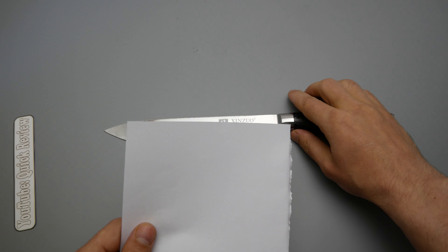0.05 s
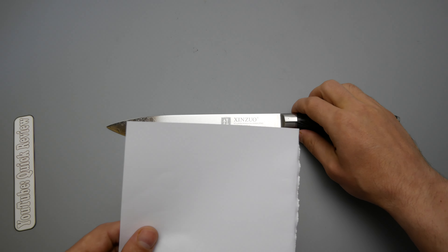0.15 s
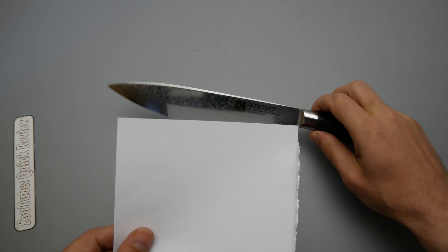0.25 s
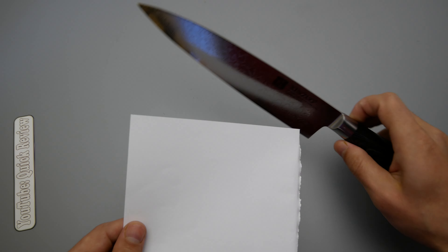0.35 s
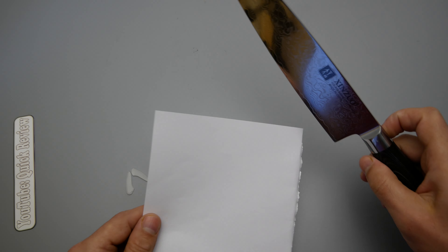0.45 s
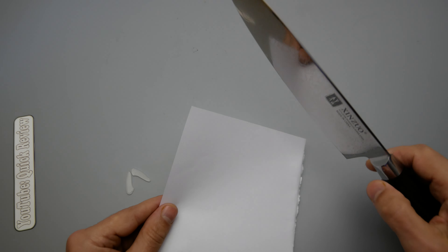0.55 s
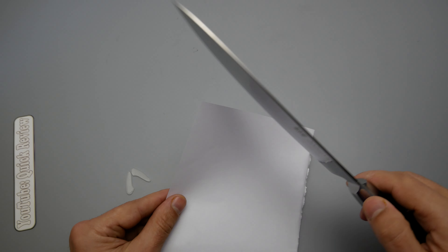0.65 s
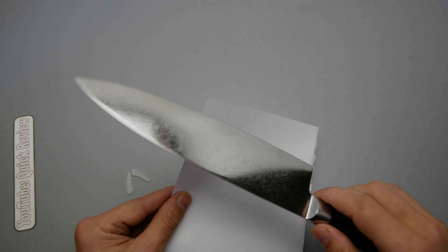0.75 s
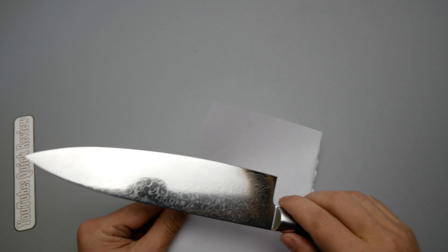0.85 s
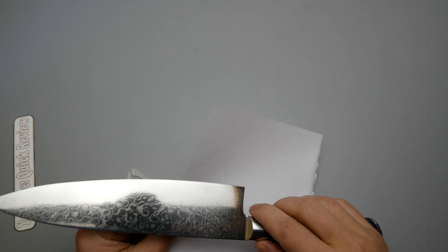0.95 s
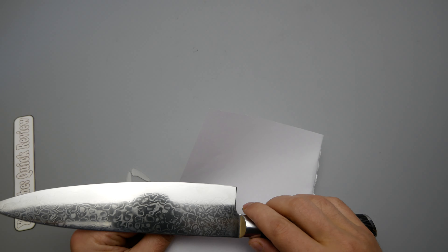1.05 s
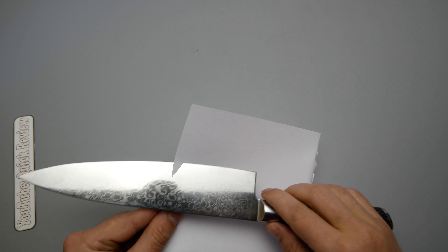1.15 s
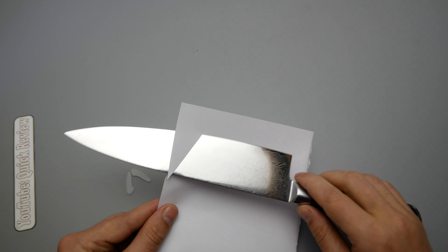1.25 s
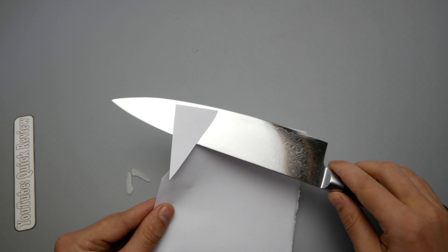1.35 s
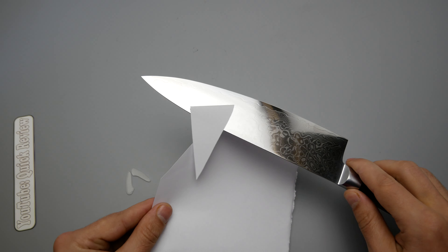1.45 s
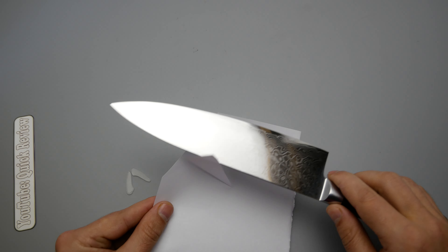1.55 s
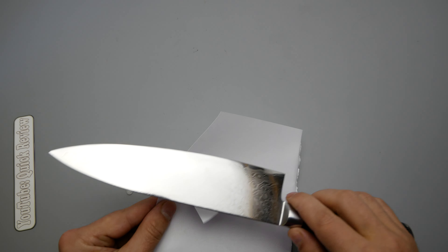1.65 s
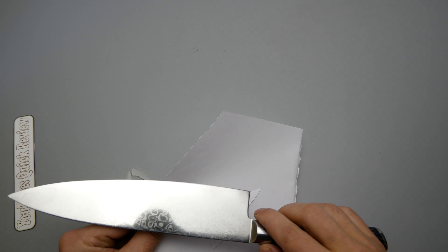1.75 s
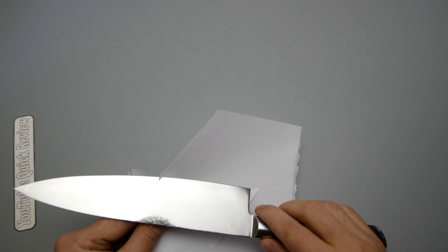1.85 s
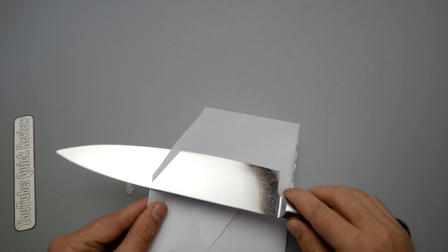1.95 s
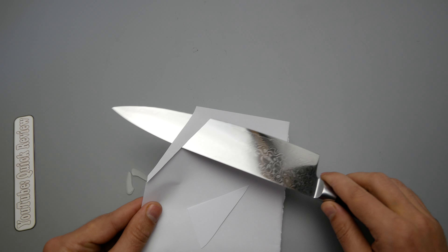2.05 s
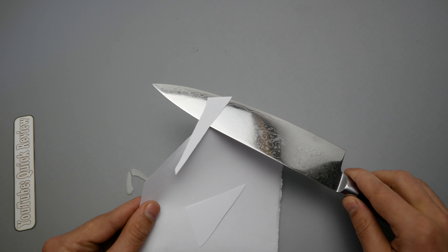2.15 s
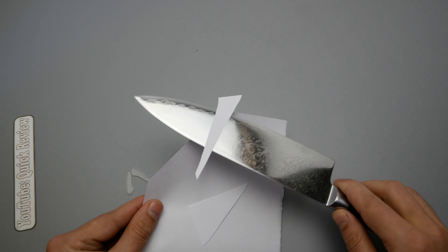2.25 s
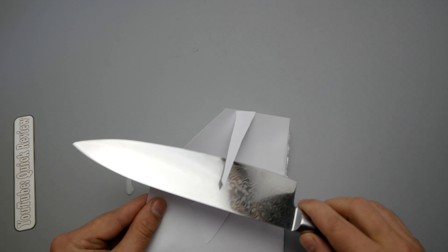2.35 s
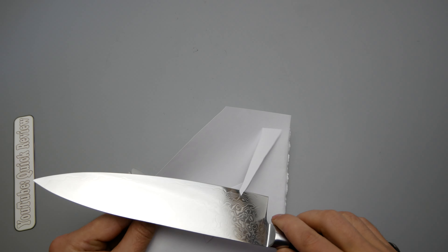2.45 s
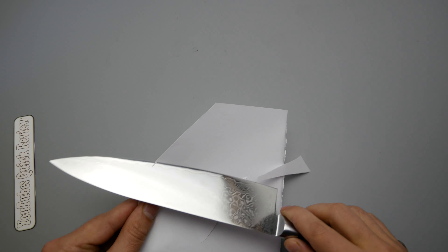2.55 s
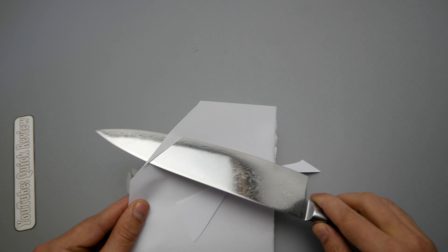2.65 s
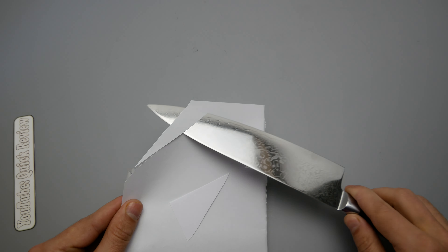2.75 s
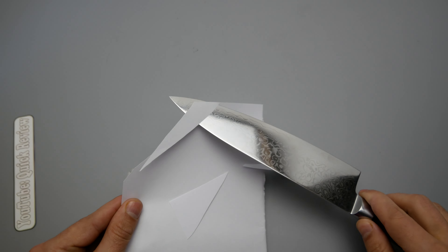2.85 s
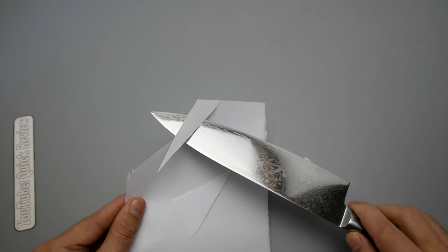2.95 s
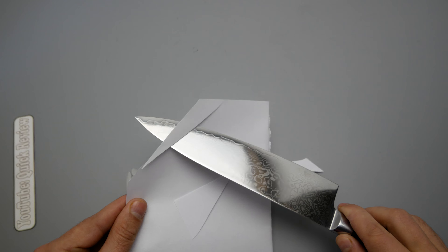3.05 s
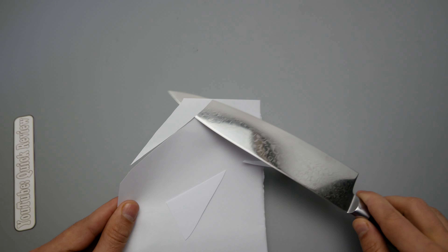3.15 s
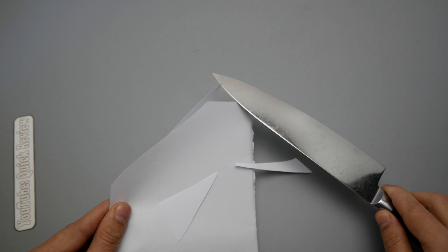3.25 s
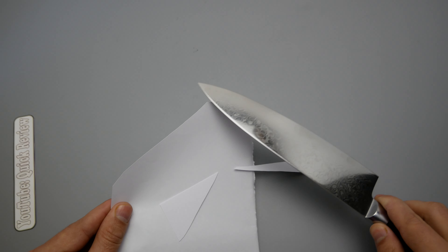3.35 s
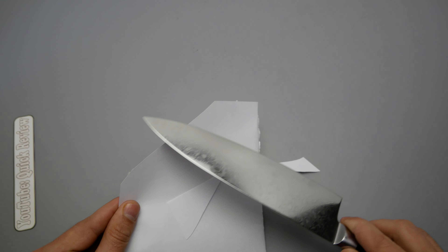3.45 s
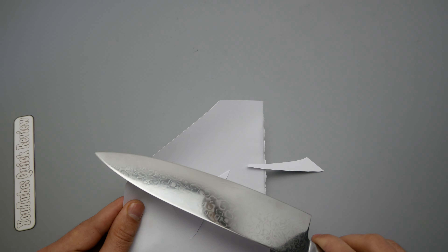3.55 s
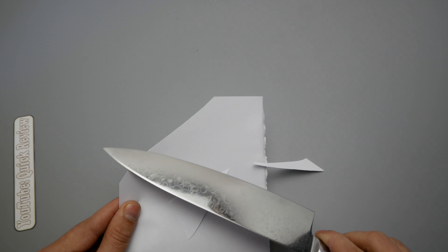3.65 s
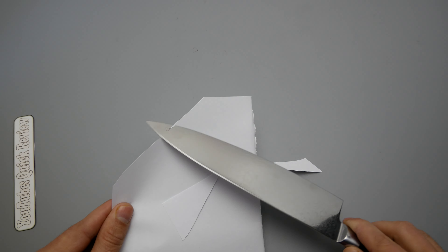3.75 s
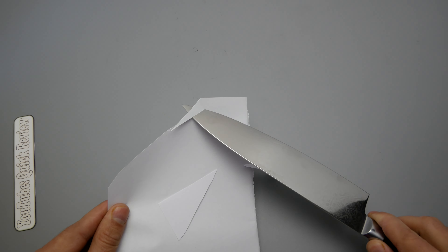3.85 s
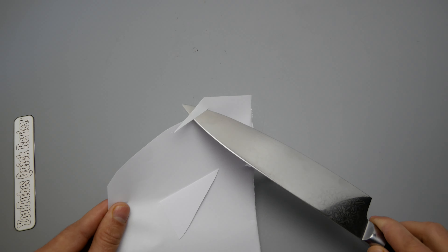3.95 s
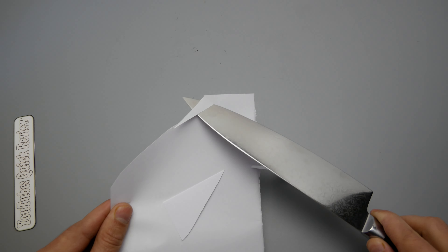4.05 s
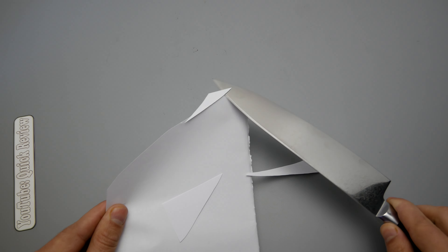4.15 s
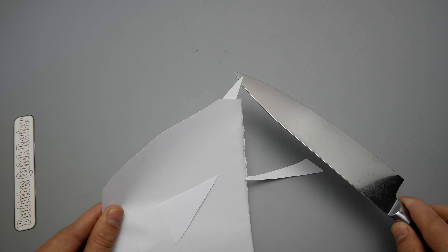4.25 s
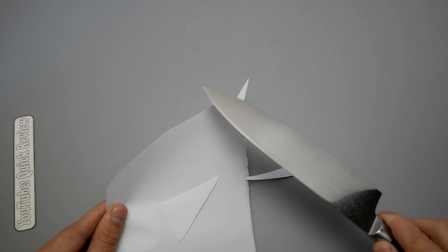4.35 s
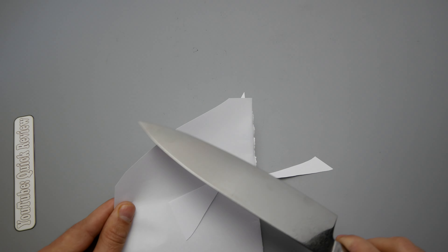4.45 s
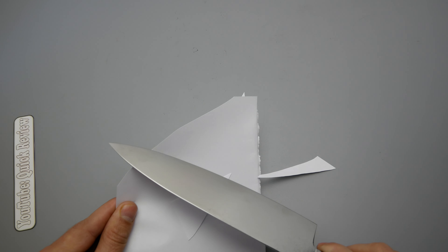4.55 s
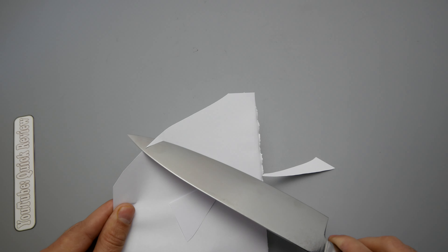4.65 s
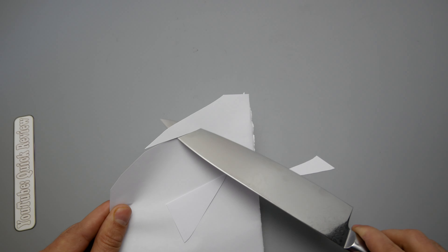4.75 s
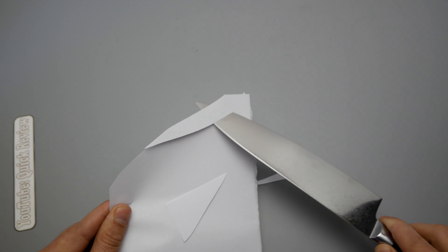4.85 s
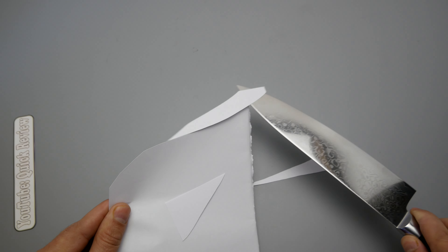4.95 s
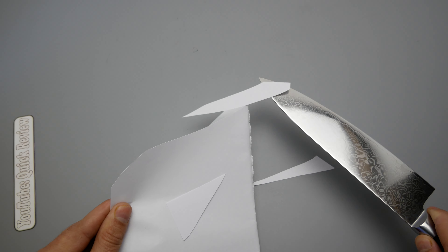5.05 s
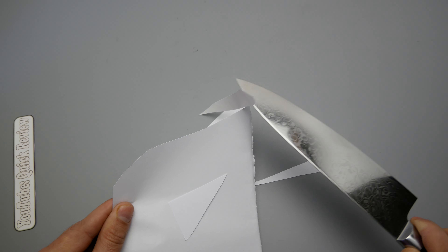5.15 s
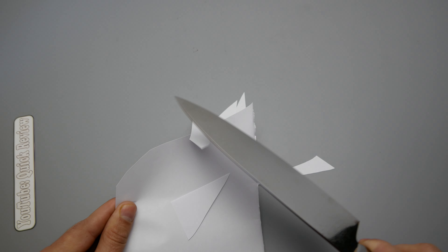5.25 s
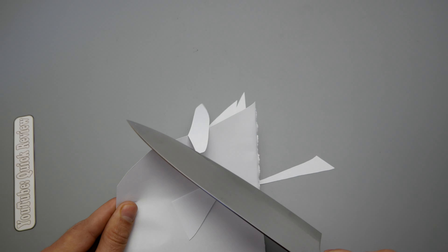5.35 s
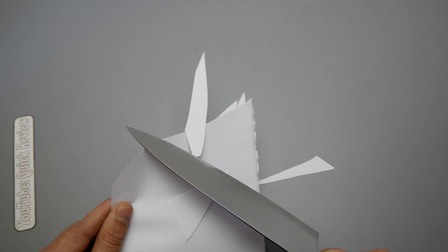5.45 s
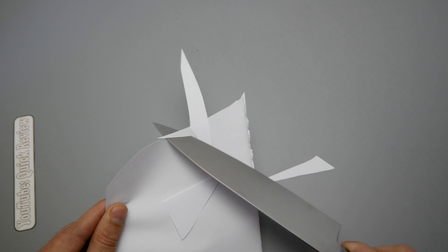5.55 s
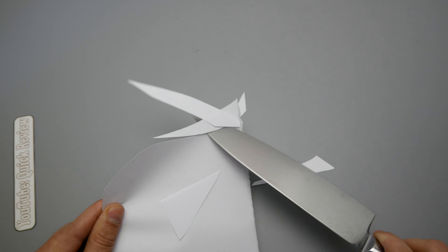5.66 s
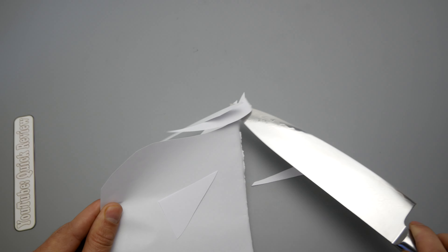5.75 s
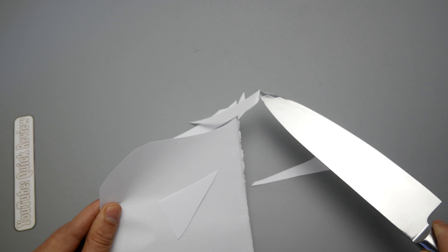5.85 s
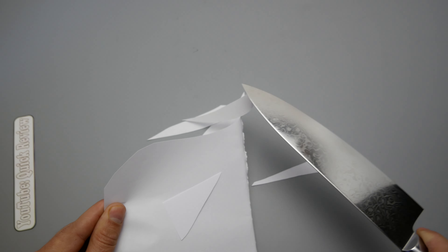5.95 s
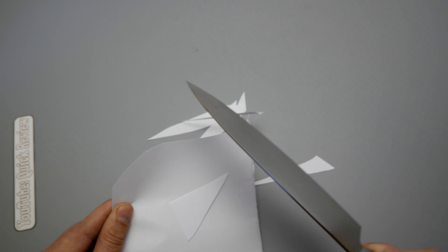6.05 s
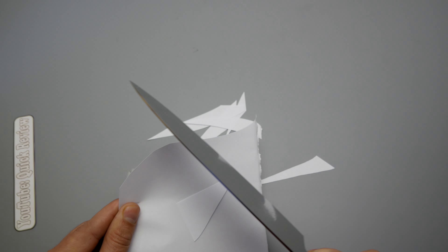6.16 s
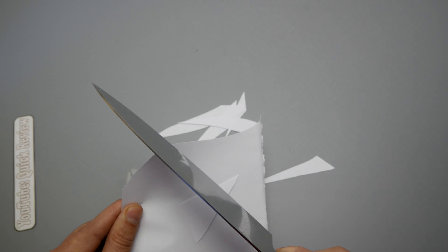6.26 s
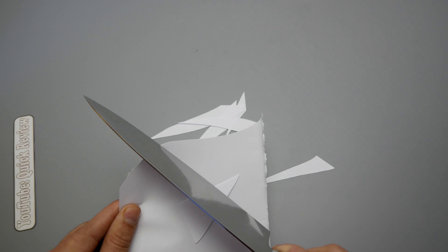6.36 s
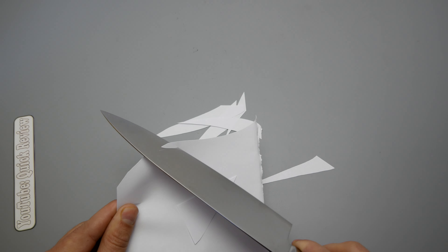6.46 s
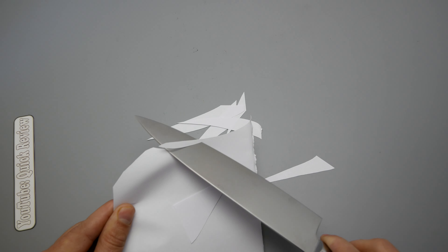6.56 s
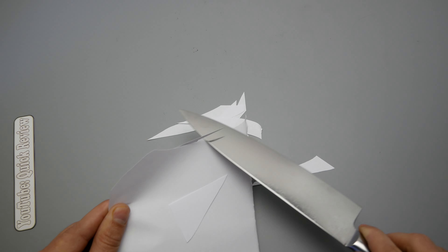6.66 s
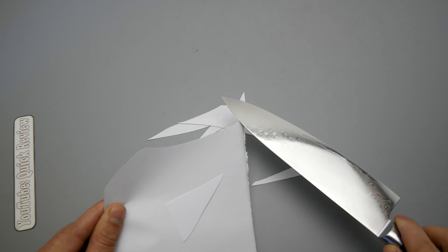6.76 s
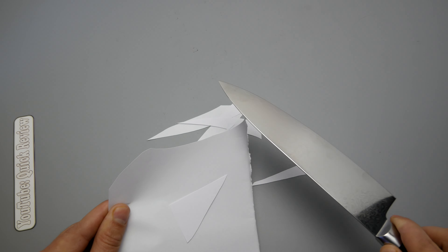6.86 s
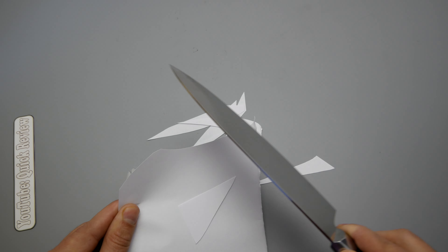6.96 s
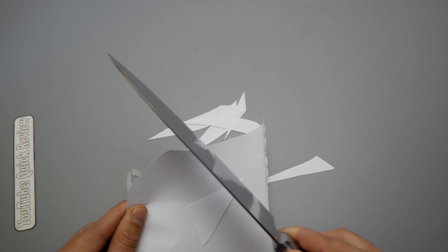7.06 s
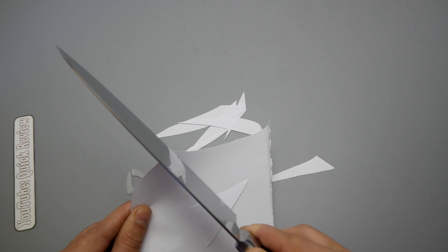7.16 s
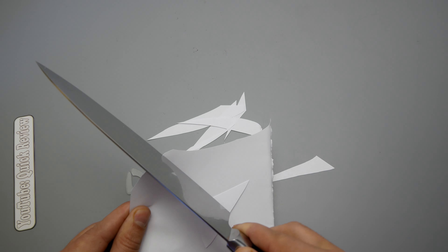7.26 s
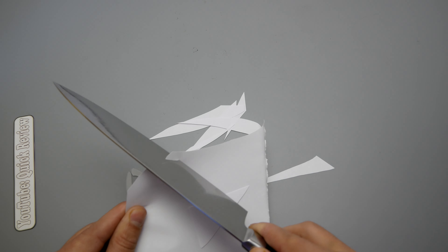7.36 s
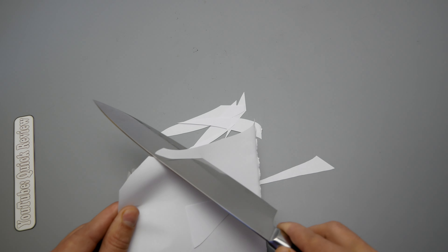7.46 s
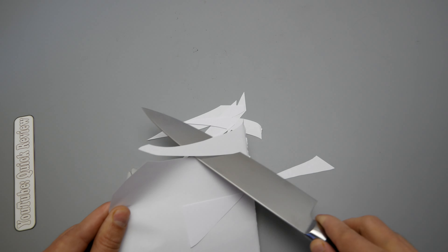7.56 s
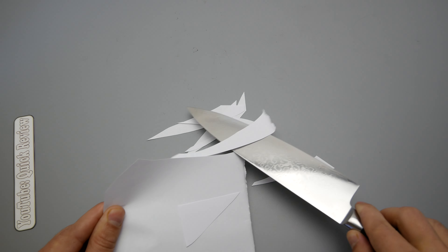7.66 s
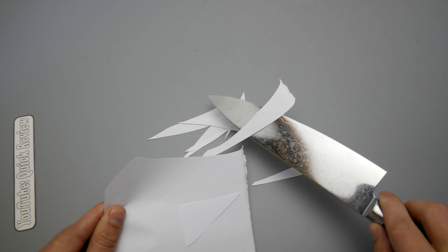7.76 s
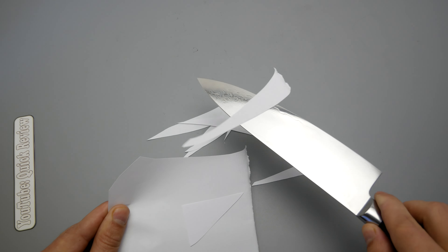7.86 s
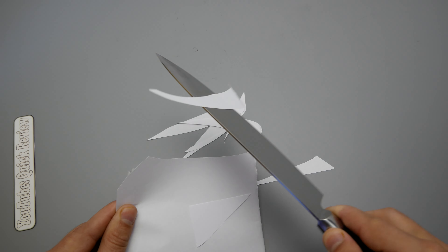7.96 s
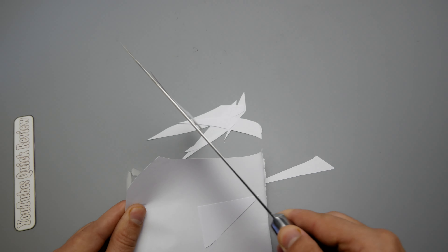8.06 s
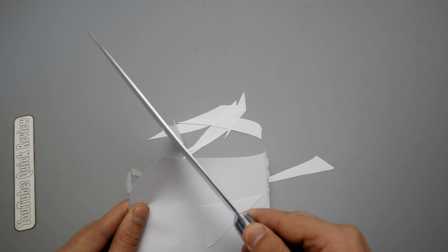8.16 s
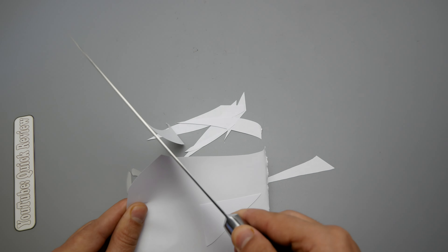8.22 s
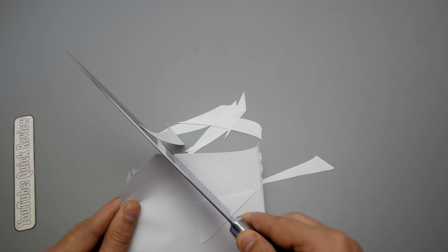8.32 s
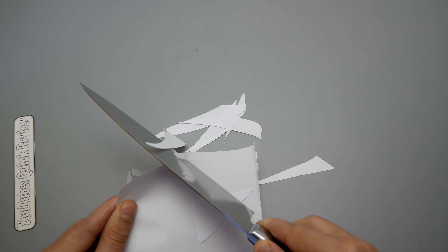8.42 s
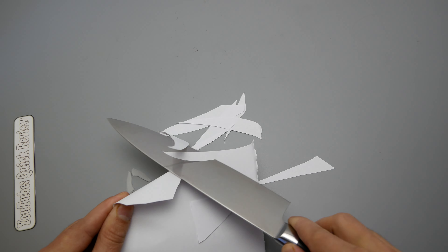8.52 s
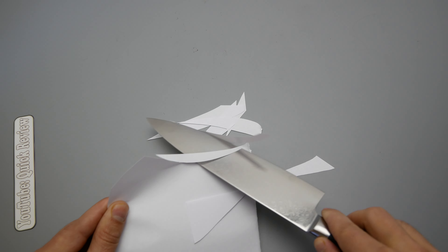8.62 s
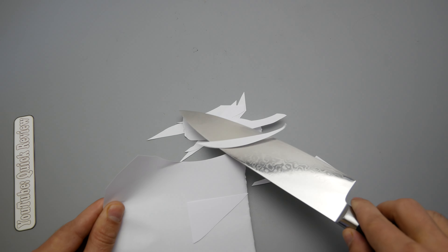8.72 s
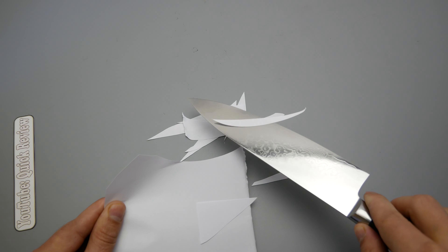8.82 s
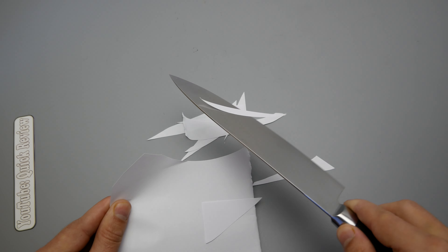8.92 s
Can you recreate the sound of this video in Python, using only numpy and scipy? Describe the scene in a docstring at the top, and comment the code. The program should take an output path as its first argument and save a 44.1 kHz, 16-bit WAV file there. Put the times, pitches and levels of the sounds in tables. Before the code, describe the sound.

A sheet of paper held near a stereo microphone rustles and snaps lightly, then a sharp knife shears strips from it in ten quick strokes. Each is a dense, bright, fibrous rip lasting a fraction of a second, followed by flutter and a very faint steel ring. Sharp paper snaps and taps fall between cuts. A small quiet room hums low and steadily behind.

```python
"""A small quiet room hums throughout, made from shaped noise and a few wavering tones.
At first a sheet of paper, held in the hand close to a stereo microphone, rustles and snaps lightly.
From about 1.2 s to the end a sharp knife slices off strips in ten cuts: dense grains of tearing fibres
shake the sheet. Between cuts it snaps (short knocks, cracks and thuds of noise) and rustles.
The blade rings faintly, as dying sine tones, after each cut."""
import sys
import numpy as np
from scipy import signal
from scipy.io import wavfile

SR = 44100
rng = np.random.default_rng(int(sys.argv[2]) if len(sys.argv) > 2 else 0)


def wrap_up_sound(samples):
    """Save the sound to the file named by the first command line argument, as 16-bit audio."""
    columns = np.atleast_2d(samples).T
    # keep every value between -1 and 1, then stretch to whole-number steps
    tamed = np.clip(columns, -1, 1)
    steps = np.round(tamed * 32767).astype(np.int16)
    wavfile.write(sys.argv[1], SR, steps)


N = 396459

# one curve for each cut, rows of (time [s], tearing level before the overall gain [dB],
# booming of the sheet against it [dB], pitch of the loose strip [Hz])
CUT_CURVES = [
    [(1.172, -65, 6, 4500), (1.18, -39, 8, 4490), (1.186, -27.5, -7.5, 4480), (1.268, -30, -10, 3930),
     (1.316, -29, -11.5, 3200), (1.362, -30, -9, 3450), (1.436, -33, -1.5, 3420)],
    [(1.915, -63, 15, 4180), (1.927, -40.5, -2, 4200), (1.939, -29.5, -5, 4300), (1.967, -31, -11, 4200),
     (1.993, -33, -3.5, 4000), (2.103, -30.5, -11.5, 3550), (2.119, -27.5, -8.5, 3670),
     (2.159, -31, -8, 3660), (2.184, -35.5, 3.5, 3640)],
    [(2.568, -60, 11, 3650), (2.622, -33, -1.5, 3400), (2.658, -31, 3.5, 3900), (2.684, -33, -1.5, 4150),
     (2.742, -28, -12.5, 3800), (2.818, -28, -1, 3440), (2.846, -33, -0.5, 3870), (2.874, -30.5, -6, 3870),
     (2.91, -35.5, 3, 3480)],
    [(3.675, -74, 9, 3690), (3.681, -55, 12, 4030), (3.713, -54, 3, 4200), (3.729, -36, -3.5, 4200),
     (3.819, -32, -9.5, 3900), (3.837, -23.5, -17, 4020), (3.933, -27.5, -7, 3700), (3.955, -33, -5, 3660)],
    [(4.125, -29.5, 5.5, 4290), (4.131, -27, 2.5, 4370), (4.214, -26.5, -11, 4660)],
    [(4.645, -79, 21, 3970), (4.651, -63.5, 17.5, 4030), (4.689, -29.5, -0.5, 3900),
     (4.827, -28, -14.5, 3700), (4.847, -29.5, -4.5, 3530), (4.887, -24.5, -9.5, 3500),
     (4.915, -28, -4, 3610), (4.971, -27, -7.5, 4170), (5.01, -33, -5, 3970)],
    [(5.516, -54, 22, 3550), (5.566, -30.5, 2.5, 3720), (5.6, -28.5, -0.5, 3810), (5.626, -30.5, 1, 4340),
     (5.672, -28, -13, 3640), (5.692, -29, -8.5, 3600), (5.772, -28, -13, 3420), (5.798, -31.5, -2, 3600),
     (5.828, -31.5, -11, 3360)],
    [(6.417, -51, 13, 3440), (6.475, -28.5, 7.5, 3480), (6.517, -28, 4, 3510), (6.581, -31, -7.5, 4140),
     (6.607, -33.5, 2, 3860), (6.629, -30.5, -6, 3600), (6.707, -31.5, 2, 3750), (6.733, -43.5, 0, 3900)],
    [(7.32, -60, 9, 3510), (7.344, -42, 11.5, 3540), (7.378, -28, 7.5, 3570), (7.396, -23, 0.5, 3540),
     (7.41, -32.5, 9, 3560), (7.418, -29, 0, 3590), (7.518, -31, 2.5, 3720), (7.576, -26, -9.5, 4240),
     (7.69, -32, -7, 3800)],
    [(8.392, -59, 18, 3800), (8.4, -35.5, 11, 3800), (8.424, -22.5, 2.5, 3970), (8.532, -32.5, 1, 4170),
     (8.588, -27, -6.5, 4040), (8.664, -28, -10.5, 3660), (8.69, -27, -7.5, 4050), (8.734, -27.5, 1, 3760),
     (8.77, -32.5, 2.5, 3390)],
]
# start and end of each cut: (edge hiss at the bite [dB], edge hiss at the end [dB],
# ring of the blade springing free [dB], exit fade [dB per root s], booming of the exit [dB])
CUT_ENDS = [(-47, -41.5, -54, 99, -0.5), (-38, -42.5, -53, 86, 0), (-37.5, -43, -67, 95, 4),
            (-46, -38, -61, 88, 0.5), (-37, -37.5, -52, 123, -9), (-37.5, -39, -68, 95, -1),
            (-39, -35, -68, 92, 0.5), (-38, -35.5, -77, 100, 9), (-40.5, -35.5, -54, 89, -4),
            (-40, -36.5, -68, 87, 7)]


def from_db(db):
    """Turn decibels into gain."""
    return 10 ** (np.asarray(db) / 20)


def rms_one(x):
    """Scale to an rms (average strength) of 1."""
    return x / np.sqrt(np.mean(x ** 2) + 1e-20)


def at_hz(points, hz):
    """Read a table of (frequency, value) at hz, on a log-frequency axis."""
    table_hz, values = np.transpose(points)
    return np.interp(np.log(hz), np.log(table_hz), values)


def drift(rate_hz):
    """Slow random wandering of rms 1: smoothed noise, made at every 40th sample and joined by lines."""
    r = np.exp(-80 * np.pi * rate_hz / SR)
    noise = rng.standard_normal(N // 40 + 2002)
    slow = signal.lfilter([1], [1, -2 * r, r * r], noise)[2000:]   # drop the filter's start-up
    return np.interp(np.arange(N) / 40, np.arange(len(slow)), rms_one(slow))


def resonance(x, hz, width_hz):
    """Let one pitch ring, like a mode of a solid: a two-pole band-pass with gain 1 on top."""
    r = np.exp(-np.pi * max(width_hz, 1) / SR)
    poles = [1, -2 * r * np.cos(2 * np.pi * hz / SR), r * r]
    return signal.lfilter([(1 - r * r) / 2, 0, (r * r - 1) / 2], poles, x)


def bands(per_octave, low_hz):
    """Neighbouring band filters up to near 19 kHz, as (index, centre [Hz], filter)."""
    edges = low_hz * 2 ** np.arange(0, np.log2(19000 / low_hz), 1 / per_octave)
    return [(k, np.sqrt(low * high), signal.butter(2, [low, high], "band", fs=SR, output="sos"))
            for k, (low, high) in enumerate(zip(edges, edges[1:]))]


def spread(mid, side, alike):
    """Mix two noises into left and right with the given likeness (1 same, -1 opposite)."""
    alike = np.clip(alike, -1, 1)
    return np.sqrt(1 + alike) * mid + np.sqrt(1 - alike) * side * np.array([[1], [-1]])


def air(patchy_db=0.7):
    """Room noise: bands of noise with their own level, slow drift and stereo likeness; rms 1."""
    # colour of the room noise: (frequency [Hz], level per Hz [dB])
    air_colour = [(15, -60), (25, -31), (85, -30.5), (102, -13.5), (122, -16.5), (171, -15), (273, -11),
                  (538, -15.5), (612, -29), (679, -15), (1480, -24), (2310, -27), (2910, -28.5),
                  (5730, -38), (12500, -51), (16200, -77), (22000, -120)]
    # how alike the two sides are: (frequency [Hz], likeness [-1 to 1])
    air_alike = [(60, 0.81), (180, -0.37), (540, -0.43), (1630, -0.074), (4910, 1), (14800, 0.61)]
    out, white = 0, rng.standard_normal((2, 2, N))
    for k, hz, sos in bands(2, 20):
        mid, side = signal.sosfilt(sos, white[k % 2])   # neighbouring bands use different noise
        gain_db = at_hz(air_colour, hz) + patchy_db * drift(1.4)
        out = out + from_db(gain_db) * spread(mid, side, at_hz(air_alike, hz))
    return rms_one(out)


def hum(waver_db=1.2, right_lag_rad=1.4, sway_rad=0.5):
    """Tones of a mains appliance wander in pitch and level; the phase between the sides sways."""
    # the tones: (pitch [Hz], wander [Hz], average level against the room noise [dB])
    hum_tones = [(120.8, 1.68, -8), (139, 5.68, -13.5), (375.5, 5.5, -13), (485, 4.83, -13),
                 (536, 4.98, -15)]
    out = 0
    for hz, wander_hz, db in hum_tones:
        phase = 2 * np.pi * np.cumsum(hz + wander_hz * drift(3.77)) / SR
        lag = np.array([[0], [1]]) * (right_lag_rad + sway_rad * drift(1.3))   # right side only
        out = out + from_db(db + waver_db * drift(6.0)) * np.sqrt(2) * np.sin(phase - lag)
    return out


def room(x, t60_s=0.13, wall_cut_hz=10000):
    """Echoes between the walls: six feedback delays a side, weaker and duller on every round."""
    out, dull = np.zeros((2, N)), np.exp(-2 * np.pi * wall_cut_hz / SR)
    lags = (np.geomspace(0.011, 0.031, 12) * SR).astype(int)   # 11 to 31 ms, in samples
    for k, lag in enumerate(lags):
        loop, state = x.copy(), [0.]
        gain = from_db(-60 * lag / SR / t60_s)
        for i in range(lag, N, lag):   # one round of the delay at a time
            back, state = signal.lfilter([gain * (1 - dull)], [1, -dull], loop[i - lag:i], zi=state)
            loop[i:i + lag] += back[:N - i]
        out[k % 2] += (loop - x) * (-1) ** (k // 2)   # echoes only, with alternating signs
    return out


def blade():
    """The steel's long modes ring out as dying sines when it leaves each cut."""
    # modes of the steel: (pitch [Hz], level against the ring [dB], time to die by 60 dB [s])
    blade_modes = [(2261, 0, .8), (2912, -12, .6), (1195, -12, .9)]
    t, out = np.arange(N) / SR, 0
    for curve, (_, _, ring_db, *_) in zip(CUT_CURVES, CUT_ENDS):
        since = np.maximum(t - curve[-1][0], 0)   # zero, so silent, until the cut ends
        for hz, mode_db, t60_s in blade_modes:
            level_db = ring_db + mode_db - 60 * since / t60_s
            out = out + from_db(level_db) * np.sin(2 * np.pi * hz * since)
    return out


def sheet(x, bend_db):
    """Resonances of sheet and table top stand out and come and go as the sheet bends."""
    # (pitch [Hz], width [Hz], average level above the smooth colour [dB])
    sheet_modes = [(683, 94, 7), (900, 13.3, 4), (1153, 51, 5.5), (1230, 36, 3), (1310, 26, -8.5),
                   (1502, 38.6, 14), (1610, 11, -5), (1887, 4.3, -28), (1965, 32, -2.5), (2410, 11, -45),
                   (2840, 15, -10), (3117, 30, -4.5), (3426, 100, -5), (3710, 39, -6.5), (4000, 72, -8),
                   (4166, 31, -3), (4385, 28, -0.5), (5208, 44, 3), (5420, 51, -12), (6180, 55, 0.5),
                   (9480, 33, 7.5), (10170, 370, -1)]
    return x + sum(from_db(db + bend_db * drift(4.9)) * resonance(x, hz, width_hz)
                   for hz, width_hz, db in sheet_modes)


def snaps(width_share=0.7, rise_s=0.0003, thud_hz=220, crack_speed=3.0, ring_share=0.36):
    """Each snap is a dying knock of noise around its own pitch, a shorter bright crack and a push of air."""
    # snaps, flaps and taps of the sheet: (time [s], peak of the knock before the sheet colours it [dB],
    # centre [Hz], crack against the knock [dB], air thud against the knock [dB])
    snap_list = [(0.365, -34, 680, -26, -8), (0.59, -35, 1110, -17, -24), (1.184, -28, 1570, -25, -42),
                 (1.489, -24, 1030, -24, -36), (1.6, -40, 4400, -14, -24), (1.671, -28.5, 1510, -14, -16),
                 (1.702, -29, 1570, -29, -36), (1.816, -56, 1240, -21, -21), (1.924, -32, 1530, -18, -43),
                 (2.249, -29.5, 590, -29, -32), (3.246, -24.5, 1220, 1.5, -13),
                 (3.285, -20, 1130, -33, -25), (3.296, -19, 1810, -33, -21), (3.34, -20, 685, -43, -38),
                 (3.45, -37.5, 4900, -6, -28), (3.684, -36.5, 690, -29, -5), (3.726, -25, 3800, -18, -33),
                 (4.124, -19, 674, -17, -14.5), (4.247, -25, 1030, -17, -23), (4.65, -33, 1070, -26, -26),
                 (5.056, -48, 953, -19, -27), (5.297, -45, 3500, -16, -32), (5.346, -31, 695, -24, -42),
                 (5.418, -29.5, 1400, -27, -20), (5.461, -30, 1300, -25, -34), (5.515, -34, 900, -21, -4),
                 (5.855, -24.5, 2630, -9, -16.5), (5.921, -28.5, 3630, -9, -30),
                 (6.026, -38, 1610, -10, -23), (6.101, -37, 2040, -5, -25), (6.203, -36, 4000, -9, -22),
                 (6.224, -36.5, 3330, 3, -21), (6.419, -30, 1550, -27, -13), (6.454, -17, 2000, -32, -33),
                 (6.74, -17, 697, -33, -12), (7.325, -35, 640, -15, -20), (7.384, -23, 1380, -25, -13.5),
                 (8.188, -29, 1780, -11, -28), (8.451, -9, 1860, -30, -36), (8.401, -19, 1380, -24, -43)]
    usual_t60_s, t60_per_db = 0.048, 0.21   # fade by 60 dB for a -33.5 dB snap; share longer per dB louder
    jolt = 2.8   # first push of a snap against the noise that follows
    length = 8820   # 0.2 s in samples
    out, t = np.zeros(N + length), np.arange(length) / SR
    bright = signal.butter(2, [3000, 12000], "band", fs=SR, output="sos")
    noises = rng.standard_normal((len(snap_list), length))
    for (start, db, hz, crack_db, thud_db), noise in zip(snap_list, noises):
        t60_s = max(usual_t60_s * (1 + t60_per_db * (db + 33.5)), 0.005)
        fade_db = -60 * t / t60_s
        puff = noise * from_db(fade_db) * np.minimum(t / rise_s, 1)
        puff[:round(SR / hz / 4)] += jolt   # lasts a quarter of a cycle
        knock = resonance(resonance(puff, hz, width_share * hz), hz, width_share * hz)
        crack = signal.sosfilt(bright, noise * from_db(crack_speed * fade_db))
        thud = resonance(resonance(puff, thud_hz, 144), thud_hz, 144)
        parts = [(0, knock), (crack_db, crack), (thud_db, thud)]
        snap = sum(from_db(db + part_db) * part / np.abs(part).max() for part_db, part in parts)
        out[round(start * SR):][:length] += snap
    out = out[:N] + 1e-18
    shaken = out + ring_share * (sheet(out, bend_db=6.5) - out)
    return shaken * np.sqrt(np.mean(out ** 2) / np.mean(shaken ** 2))   # the resonances colour, not amplify


def fibres(per_s, uneven_db):
    """Fibres part at random moments with uneven force; two streams share the moments but not the signs."""
    force = from_db(uneven_db * np.minimum(rng.exponential(1, N), 5))
    sizes = force * (rng.random(N) < per_s / SR)
    return rms_one(sizes * rng.choice([-1, 1], (2, N)) + 1e-18)


def crinkles(x, level_db=-2.5, flicker_db=7.5, width_hz=29.4):
    """Many small bending modes of the sheet ring up briefly as its shape changes."""
    pitches = np.geomspace(1800, 10500, 26) * rng.uniform(0.97, 1.03, 26)
    return x + sum(from_db(level_db + flicker_db * drift(14.0)) * resonance(x, hz, width_hz)
                   for hz in pitches)


# a rustle starts this far below its level; hiss against its level; strip pitch; extra slow flexing
RUSTLE_RISE_DB, RUSTLE_HISS_DB, RUSTLE_STRIP_HZ, RUSTLE_SLACK_DB = 10.5, -10.5, 3630, 0.5
RUSTLE_DULLS = 0.38   # a booming rustle loses this much hiss per dB of boom


def rustle(start, rise, hold, db, fade_db, boom_db):
    """Paper rubs and flaps: times and controls of one rustle that rises, holds and fades."""
    bends = start + np.cumsum([0, max(rise, 0.001), max(hold, 0), 40 / fade_db])   # fades by 40 dB
    t = np.arange(max(start, 0), bends[-1], 1 / SR)
    level_db = np.interp(t, bends, [db - RUSTLE_RISE_DB, db, db, db - 40])
    hiss_db = RUSTLE_HISS_DB - RUSTLE_DULLS * boom_db
    return t, level_db, boom_db, RUSTLE_SLACK_DB, hiss_db, RUSTLE_STRIP_HZ


def cut(curve, slack, bite_hiss_db, end_hiss_db, exit_db, exit_boom_db):
    """The blade tears fibres along the curve, then the strip flutters out: times and controls of one cut."""
    exit_s, exit_strip_hz, exit_hiss_db = 0.22, 3600, -6.5   # fast at first, still after exit_s
    hiss_follows, steady_above_db = 0.17, -35.5   # in full cut the hiss swings less than the tearing
    s, *columns = np.transpose(curve)
    t = np.arange(s[0], s[-1] + exit_s, 1 / SR)
    ends = s[[0, -1]]
    tear_db, boom_db, strip_hz = [np.interp(t, s, column) for column in columns]
    after = np.maximum(t - s[-1], 0)   # seconds since the strip came free
    tear_db = tear_db - exit_db * np.sqrt(after) + 20 * np.log10(1.001 - (after / exit_s) ** 2)
    swing = tear_db - steady_above_db
    hiss_db = np.interp(t, ends, [bite_hiss_db, end_hiss_db])
    hiss_db = hiss_db + np.where(swing > 0, hiss_follows * swing, swing)
    edge_db = np.where(after > 0.01, exit_hiss_db, hiss_db - tear_db)   # hiss against the tearing
    boom_db = np.where(after > 0, exit_boom_db, boom_db)
    strip_hz = np.where(after > 0, exit_strip_hz, strip_hz)
    return t, tear_db, boom_db, np.interp(t, ends, slack), edge_db, strip_hz


def stroke_curves():
    """All movements on one time axis: powers add, and the colour leans to the louder one."""
    # rubbing, flapping and rustling: (start [s], rise [s], hold [s], level before the overall gain [dB],
    # fade [dB per s], booming against it [dB])
    rustle_list = [(0.0, 0.0056, .01, -62, 60, 3), (0.133, .04, 0.14, -51.5, 120, -2.5),
                   (0.362, 0.032, 0.075, -52.5, 198, -2.5), (0.547, 0.039, 0.1, -50, 170, 0),
                   (1.485, 0.0034, .001, -53, 294, 30.5), (1.586, 0.02, .001, -47, 296, -6),
                   (1.672, 0.0023, .001, -36, 500, 2), (1.691, .006, 0.022, -46.5, 350, 9.5),
                   (1.812, .013, .001, -54.5, 400, 6), (2.242, 0.0061, .001, -52.5, 360, 23.5),
                   (2.4, 0.17, .03, -57.5, 300, 2.5), (2.445, .004, .004, -56, 500, 0),
                   (3.09, 0.0084, .001, -61, 900, -21), (3.158, 0.039, 0.093, -51, 500, -0.5),
                   (3.243, 0.0017, 0.0068, -35.5, 1200, 3.5), (3.293, .002, 0.0066, -37.5, 800, 15.5),
                   (3.337, 0.0033, 0.0023, -40.5, 453, 15), (3.446, 0.0034, 0.0025, -46, 1097, -11),
                   (4.095, .012, .001, -54.5, 500, -9), (4.236, 0.007, 0.019, -47, 305, 17),
                   (5.039, 0.034, .001, -50, 88, 8.5), (5.19, 0.012, 0.0093, -56, 500, -18),
                   (5.274, 0.026, .001, -48.5, 915, -6), (5.342, 0.0025, 0.03, -48.5, 200, 8.5),
                   (5.412, 0.0031, 0.07, -47, 200, 6.5), (5.84, 0.018, .001, -49.5, 300, 11),
                   (5.914, 0.0072, .001, -43, 498, 1), (5.974, 0.13, 0.024, -59, 405, 4),
                   (6.2, 0.005, .001, -52, 395, -13), (6.739, .003, 0.0024, -23.5, 1500, -0.5),
                   (6.745, 0.005, 0.058, -44, 398, 1), (8.185, 0.0045, .001, -45.5, 600, 1),
                   (8.2, .021, .06, -67, 300, 3)]
    # how slack the sheet is held in each cut: (slow flexing at the bite [dB], at the end [dB])
    cut_slack = [(-3.5, 2), (0, -2.5), (0.5, -2), (3, -3), (1, -0.5), (3, -4), (-1.5, -3.5), (-0.5, -0.5),
                 (1.5, -1), (-3, 0.5)]
    moves = [cut(curve, slack, bite_db, end_db, *leaving)
             for curve, slack, (bite_db, end_db, _, *leaving) in zip(CUT_CURVES, cut_slack, CUT_ENDS)]
    moves += [rustle(*row) for row in rustle_list]
    # rows: power, then boom, slack, hiss and strip pitch weighted by power; a trace of power at rest
    at_rest = np.array([[1], [0], [0], [RUSTLE_HISS_DB], [RUSTLE_STRIP_HZ]])
    sums = np.ones((5, N + SR)) * 1e-10 * at_rest
    for t, level_db, *colour in moves:
        power = from_db(2 * level_db)
        sums[:, int(t[0] * SR):][:, :len(t)] += [power] + [power * c for c in colour]
    return 10 * np.log10(sums[0, :N]), *(sums[1:, :N] / sums[0, :N])


def tearing(patchy_db=1.0, catch_db=-0.5, strip_db=4.5, strip_octaves=0.59):
    """Grains shake the sheet; the edge catches unevenly and the bands come and go in patches."""
    # centres of slow flexing, drumming, tearing and edge hiss [Hz]
    part_hz = [680, 1550, 4100, 9200]
    # usual colour of the tearing: (frequency [Hz], level per Hz [dB])
    tear_colour = [(88, -57), (150, -15), (276, -2.5), (415, -12), (647, -3), (991, 2.5), (1520, 4.5),
                   (1730, -7.5), (1890, 3), (2550, 0.5), (5340, -5), (8020, -14), (10400, -17),
                   (12500, -24.5), (16200, -61), (22000, -120)]
    # how alike the two sides are: (frequency [Hz], likeness [-1 to 1])
    tear_alike = [(60, -0.37), (180, 0.35), (540, 0.67), (1630, -0.28), (4910, 0.95), (14800, 0.62)]
    # stereo balance: (frequency [Hz], left minus right [dB])
    tear_balance = [(60, -1), (180, 3), (540, 4), (1630, -3), (4910, 0.5), (14800, -1.5)]
    usual_boom_db, usual_hiss_db = -0.42, -13.5   # here the tearing has its usual colour
    flex_follows, drum_follows = 1.104, 0.82   # how far each follows the booming
    overall_db = 0.5
    tear_db, boom_db, slack_db, hiss_db, strip_hz = stroke_curves()
    boom_db = boom_db - usual_boom_db
    grains = crinkles(sheet(fibres(4000, 0.82), bend_db=5.5))
    scatter = rng.standard_normal(N)   # plain noise that sets the sides apart
    flex_db, drum_db = flex_follows * boom_db + slack_db, drum_follows * boom_db
    tilts = np.array([flex_db, drum_db, 0 * tear_db, hiss_db - usual_hiss_db])
    out, catch = 0, catch_db * drift(25)
    for k, hz, sos in bands(3, 140):
        weights = [np.interp(np.log(hz), np.log(part_hz), row) for row in np.eye(4)]
        # the cut strip flutters: a bump around its moving pitch
        strip = strip_db * np.exp(-(np.log2(hz / strip_hz) / strip_octaves) ** 2)
        gain_db = at_hz(tear_colour, hz) + weights @ tilts + strip + catch + patchy_db * drift(31.0)
        mid, side = signal.sosfilt(sos, grains[k % 2]), signal.sosfilt(sos, scatter)
        pair = spread(mid, side, at_hz(tear_alike, hz))
        balance = from_db(at_hz(tear_balance, hz) / 2 * np.array([[1], [-1]]))
        out = out + from_db(gain_db) * pair * balance
    return from_db(tear_db + overall_db) * out


def scene():
    """Paper and blade close by, with the room's echo of the paper, its noise and its hum behind."""
    # level of the room noise and hum: (time [s], level [dB])
    air_level = [(0, -52.5), (.8, -56), (2.0, -56), (3.6, -52.5), (6.2, -52.5), (9, -53.5)]
    air_db = np.interp(np.arange(N) / SR, *np.transpose(air_level))
    background = from_db(air_db) * (air() + hum())
    paper = tearing() + snaps()
    echo = from_db(-14) * room(paper.mean(axis=0))
    return background + echo + blade() + paper


def record(dry):
    """The microphone hisses; the sound has a narrow dip near 7900 Hz and a dark top above 12160 Hz."""
    hiss_band = signal.butter(2, [6000, 7900], "band", fs=SR, output="sos")
    hiss = signal.sosfilt(hiss_band, rng.standard_normal(N))   # the microphone's own noise
    heard = dry + from_db(-85) * hiss
    dipped = heard - resonance(heard, 7900, 180)
    # steep low-pass at 12160 Hz: the treble above it is dark
    dark = signal.sosfilt(signal.butter(10, 12160, fs=SR, output="sos"), dipped)
    # from 15300 Hz up, at least 70 dB down
    return signal.sosfilt(signal.cheby2(12, 70, 15300, fs=SR, output="sos"), dark)


dry = scene()
out = record(dry)
wrap_up_sound(out)
```